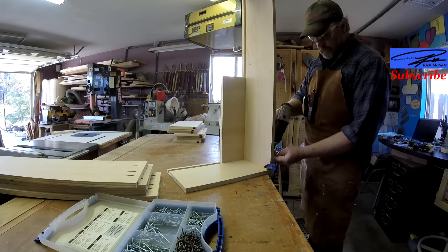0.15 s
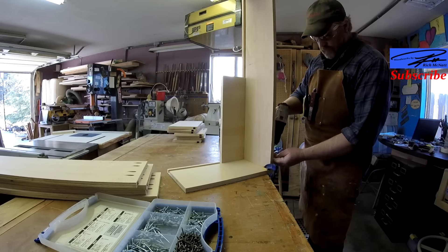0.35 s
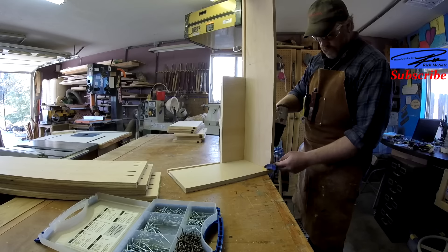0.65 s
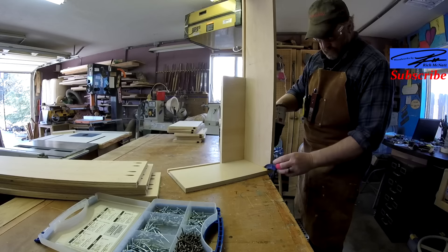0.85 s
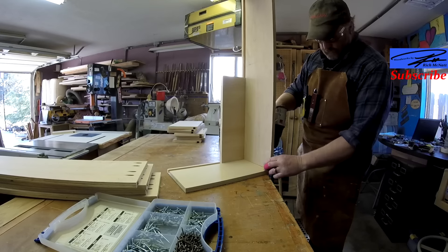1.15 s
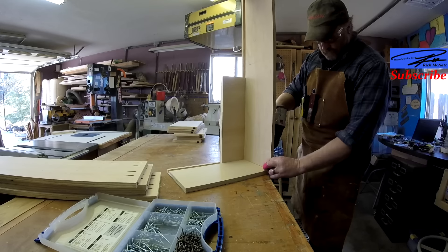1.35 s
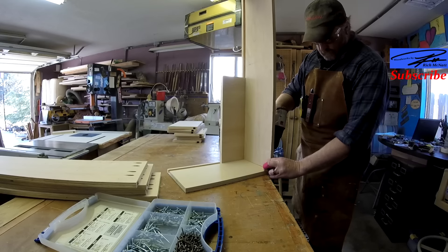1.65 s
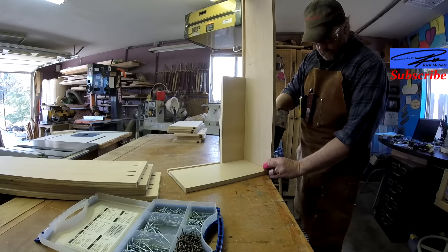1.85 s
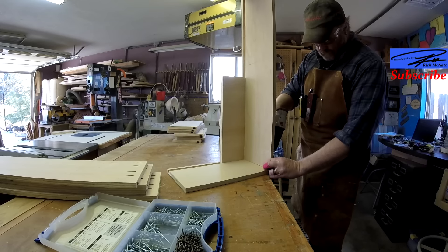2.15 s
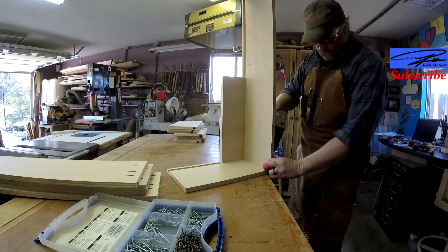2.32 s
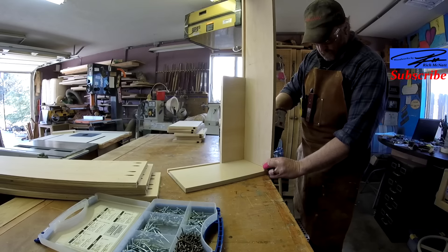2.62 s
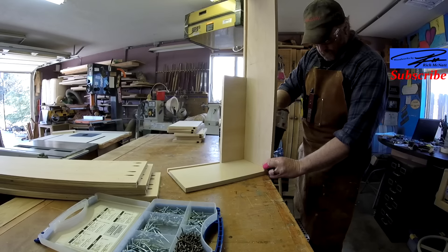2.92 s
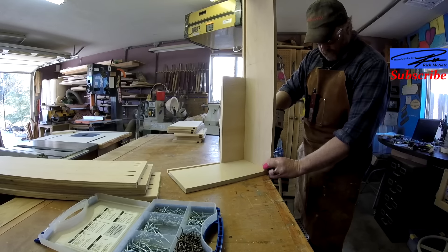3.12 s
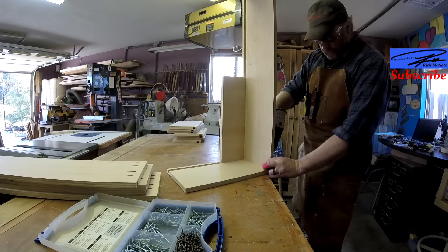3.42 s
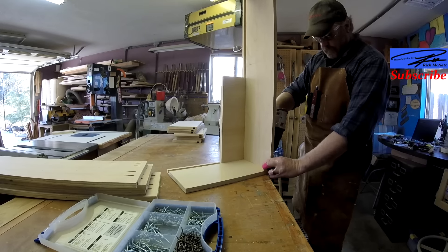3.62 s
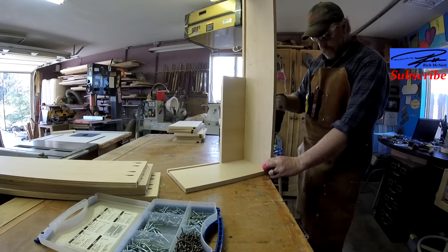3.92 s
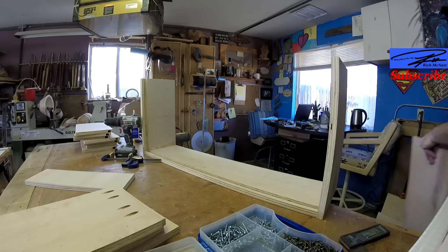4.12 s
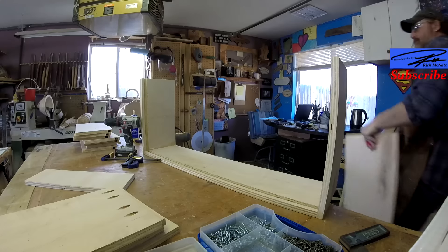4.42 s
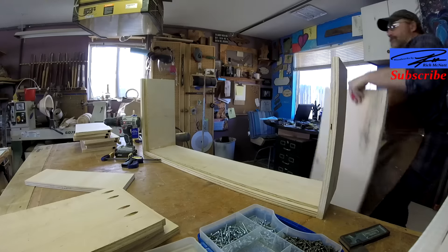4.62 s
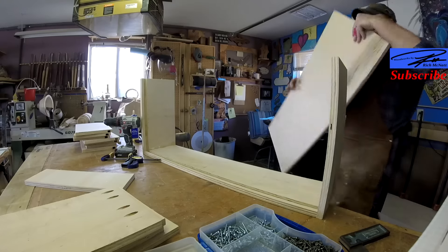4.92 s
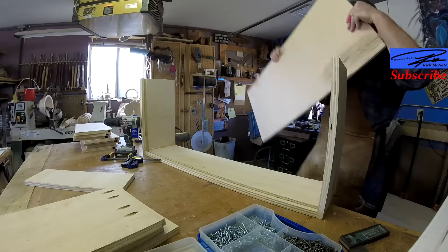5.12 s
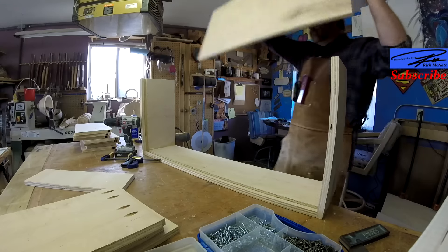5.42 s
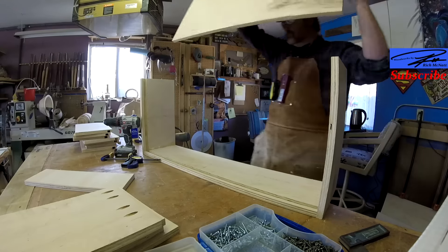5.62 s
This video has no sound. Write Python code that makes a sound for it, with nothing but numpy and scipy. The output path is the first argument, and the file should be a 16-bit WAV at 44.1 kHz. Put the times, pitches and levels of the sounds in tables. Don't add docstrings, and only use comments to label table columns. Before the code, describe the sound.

A cordless driver gives six short whining, grinding pulls into a plywood box, its clutch rattling the boards, followed by soft panel handling.

```python
import sys
import numpy as np
from scipy import signal
from scipy.fft import rfft, irfft, next_fast_len
from scipy.io import wavfile
from scipy.ndimage import uniform_filter1d, map_coordinates

SR = 44100
rng = np.random.default_rng(int(sys.argv[2]) if len(sys.argv) > 2 else 0)


def store_pcm(level_fs):
    pcm = np.round(np.clip(level_fs, -1, 1) * 32767).astype(np.int16)
    wavfile.write(sys.argv[1], SR, np.atleast_2d(pcm).T)


def volts_from_db(level):
    exponent = np.asarray(level, float) / 20
    return 10 ** exponent


N = 254016

# (start [s], let go [s], gear noise [dB], hiss re noise [dB], whine re noise [dB])
PULLS = [
    (0.935, 1.12, -36, -1, -4.5),
    (1.387, 1.52, -33.5, -2, -1),
    (1.809, 1.926, -33, -4, 4),
    (2.296, 2.414, -32, -6.5, 2),
    (2.838, 2.933, -34, 0, 10.5),
    (3.441, 3.512, -31, -12.5, -8),
]
# (spin-up [s], top gear rate [Hz], bite [s])
SPIN_UP = [(.135, 945, .004), (.1, 795, .028), (.072, 700, .02), (.042, 530, .028), (.058, 570, .024),
           (.02, 480, .022)]
START_SHARE, SAG_HZ_PER_S = 0.48, 750
ATTACK_DB, SWELL_DB_PER_S, RELEASE_DB_PER_S, COAST_S = 11.5, 19, 285, 0.075
HISS_DB_PER_OCT, WHINE_DB_PER_OCT = 9.5, 7
WHINE_FADE_DB_PER_S = 135
# (multiple of the gear rate [1], level [dB])
WHINE_PARTIALS = [(2, -9), (3, -9), (4, 4), (5, -13), (6, -5), (7, -12), (8, -3), (12, 1)]
# (multiple [1], width [Hz], level [dB])
BLURRED_BANDS = [(2, 150, -8), (4, 170, -0.5), (8, 590, 1.5), (12, 970, -21)]
# (frequency [Hz], level per Hz [dB])
GEAR_SPECTRUM = [(410, -28), (700, 4), (746, -5.5), (917, -2), (1040, -13), (1420, -1), (1680, 0),
                 (1760, 2.5), (2190, -4.5), (2590, -0.5), (3480, -6.5), (4010, -10), (5530, -7.5),
                 (11300, -27.5), (15000, -45)]
# (frequency [Hz], width [Hz], level [dB])
HOUSING_MODES = [(1760, 200, -12.5), (3400, 220, -3.5), (4460, 300, -6), (6660, 330, -9)]
SPLIT_HZ = 3700
# (time [s], length [s], level [dB], hiss re grind [dB])
CLUTCH_SLIPS = [
    (0.94, 0.0092, -34, -3.5),
    (1.921, .005, -21.5, -7),
    (2.353, 0.067, -22.5, -13),
    (2.945, 0.043, -25.5, -10.5),
    (3.461, .04, -37, -19),
    (3.508, 0.014, -40, 6),
]
SLIP_RISE_DB_PER_S, SLIP_FALL_DB_PER_S = 2500, 418

# (time [s], board level [dB], bench thump re board [dB], steel crack re board [dB],
# crack brightness [dB])
CLUTCH_JOLTS = [(1.904, -12.5, -3, -38, -5), (1.921, -8, -7, -9.5, -7), (2.336, -15.5, 3.5, -19, -23),
                (2.352, -1, -12.5, -22, -10), (2.3705, -1.5, -13.5, -17.5, -19), (2.389, -2, -13.5, -32, 2),
                (2.405, -4, -9, -11, 13), (2.424, -8, -40, -26, -1), (2.925, -16, -2, -26, -10),
                (2.942, 3, -19, -32, -13), (2.962, -4, -10, -13, -1), (2.982, -5.5, -26, -25, -12),
                (3.4643, -2, -19, -29, -7), (3.4962, -1.5, -20, -14.5, 3), (3.508, -20, -6, -6, -3)]
JOLT_HZ = 366
# (time [s], board level [dB], thump re board [dB],
# tap re board [dB], board pitch [Hz])
KNOCK_EVENTS = [(0.369, -28, -26, -13, 400), (0.426, -35, -4, -12, 470), (0.482, -45, -17, -18, 470),
                (0.526, -37.5, -7, 0, 420), (0.553, -30.5, 2, -1.5, 400), (0.6, -37, -20, -18, 483),
                (0.887, -28, -26, -8.5, 415), (0.944, -27, -22, 2, 454), (1.298, -38, -16, -2, 418),
                (1.392, -19.5, -38, -9.5, 415), (1.816, -24.5, -20, -8, 510), (2.3, -30, -17, -18, 293),
                (2.841, -16.5, -24, -21, 301), (3.442, -15, -17, -17, 320), (3.753, -44, -16, 0, 290),
                (4.259, -39.5, -5.5, -14, 500), (4.365, -38, -11.5, -20, 534), (4.92, -37.5, -16, -7, 360),
                (4.95, -40, -11, -8, 375), (5.069, -40, -22, -6, 362), (5.693, -41.5, -20, -11, 400)]
KNOCK_BRIGHT_DB = -11
# (frequency [Hz], level [dB], t60 [s])
BOARD_MODES = [(222, -0.5, 0.062), (252, 1, 0.049), (301, 1, 0.08), (356.6, 2, 0.081), (400, -1.5, 0.081),
               (469.9, 5.5, 0.058), (536, -3.5, 0.066), (644, -3.5, 0.063), (690, -8.5, 0.13),
               (753, -8, 0.079), (920, -13, 0.019), (1110, -37, 0.026)]
# (frequency [Hz], level [dB], t60 [s])
BENCH_MODES = [(60.4, -14, 0.38), (88, -0.5, 0.1), (122.7, -0.5, 0.1), (157.3, 4, 0.14)]
# (frequency [Hz], level [dB], t60 [s])
LEG_MODES = [(45, -8, 0.17), (61.4, 2, 0.17), (91, -6, 0.19), (155, -9.5, 0.31)]
# (frequency [Hz], level [dB], t60 [s])
PANEL_MODES = [(71.4, -13, 0.15), (134, -9, 0.073), (192, -12, 0.071), (249, -8, 0.082), (301, -1, 0.08),
               (400, -6, 0.044), (475, -1, 0.21), (517, -9, 0.085), (632, -7.5, 0.1), (753, -17, 0.144),
               (1130, -12.5, 0.063)]
# (frequency [Hz], level per Hz [dB])
STEEL_SPECTRUM = [(500, -21), (1000, -3.5), (1600, 13), (2300, -7.5), (3300, 11), (3900, -28), (5200, -19),
                  (7000, -16), (10000, -35), (15000, -48)]
# (frequency [Hz], level per Hz [dB])
TAP_SPECTRUM = [(500, -13), (900, -12), (1170, 3.5), (1500, -3.5), (2200, -5), (3300, -17), (5000, -13),
                (8000, -28), (15000, -56)]

# (time [s], length [s], rustle [dB], board rub re rustle [dB],
# fine cloth hiss re rustle [dB])
HAND_MOVES = [(0.19, 0.17, -72.5, 17.5, -14), (0.288, 0.09, -71, 19.5, -14), (0.443, .14, -67.5, 17.5, -15),
              (0.545, 0.061, -52, 6, -21), (3.709, 0.025, -71.5, -7, -17), (3.772, 0.081, -60.5, 0, -15),
              (4.087, 0.08, -71, 13, -14), (4.28, 0.13, -65.5, 12, -10), (4.433, 0.13, -64.5, 8, -1.5),
              (4.562, .09, -66, 1, -17), (4.68, .08, -71, -3, -9), (4.792, 0.13, -62.5, -4, -10),
              (4.946, 0.12, -60.5, 4, -17), (4.86, .06, -65, 5.5, -17), (5.068, .15, -56, 1.5, -13),
              (5.212, .07, -66.5, -2, 0.5), (5.312, 0.05, -71, 0, -3), (5.467, 0.19, -67, 5, -1),
              (5.604, 0.14, -70, 5, -9), (5.72, 0.076, -66.5, 2, -2)]
MOVE_RISE_SHARE, MOVE_HOLD_SHARE = 0.55, 0.34
MOVE_DROP_DB = 15.5
# (frequency [Hz], level per Hz [dB])
RUSTLE_SPECTRUM = [(500, -12), (800, 2), (1300, -7), (1900, -4.5), (2500, -9.5), (3000, -5), (3800, -12),
                   (5500, -22), (9000, -39), (14000, -50)]
# (frequency [Hz], level per Hz [dB])
CLOTH_SPECTRUM = [(2500, -23), (4500, -4), (6500, -1), (9000, -7.5), (13000, -20)]
# (frequency [Hz], level per Hz [dB])
SQUEAL_SPECTRUM = [(4500, -45), (5900, -14), (6500, 9), (7100, -15), (9000, -40)]
SQUEAL_S, SQUEAL_BUILD_S, SQUEAL_DB, SQUEAL_STOP_DB_PER_S = 4.41, 0.11, -63.5, 300

# (frequency [Hz], t60 [s])
SHOP_T60 = [(60, 0.45), (350, 0.43), (1000, 0.41), (3000, 0.38), (6500, 0.29), (12000, 0.27)]
# (frequency [Hz], level per Hz [dB])
AIR_SPECTRUM = [(12, 1), (20, 9), (92, 0.5), (249, -6), (320, -8.5), (433, -9), (541, -10.5), (820, -16),
                (1690, -20), (1940, -21.5), (6740, -32.5), (13100, -43), (15000, -45)]
AIR_DB = -52
DIP_S, TOP_HZ = 4.133, 15250


def driver():
    gate, gear_hz, noise_db, hiss_db, whine_db = trigger()
    slopes = [SLIP_RISE_DB_PER_S] * len(CLUTCH_SLIPS), [SLIP_FALL_DB_PER_S] * len(CLUTCH_SLIPS)
    slip = bumps([row[:3] for row in CLUTCH_SLIPS], *slopes)
    slip_hiss = bumps([(s, hold, db + more_db) for s, hold, db, more_db in CLUTCH_SLIPS], *slopes)

    phase = 2 * np.pi * np.cumsum(gear_hz * (1 + 0.007 * wobble(90))) / SR
    partials = sum(volts_from_db(db + 3.2 * wobble(80)) * np.sin(k * phase + 7 * rng.random())
                   for k, db in WHINE_PARTIALS)
    bands = sum(volts_from_db(db) * (wobble(2 * w) * np.sin(k * phase) + wobble(2 * w) * np.cos(k * phase))
                for k, w, db in BLURRED_BANDS)
    whine = coloured(unit(partials) + volts_from_db(-4) * unit(bands), GEAR_SPECTRUM)
    whine = whine + volts_from_db(-7.0 + 7.3 * wobble(49.07)) * np.sin(phase)

    teeth = 1 + 0.62 * np.cos(phase)
    noise = coloured(teeth * volts_from_db(0.61 * wobble(220)) * patchy(depth_db=3.5), GEAR_SPECTRUM)
    noise = filtered(noise, lambda f: 1 + sum(volts_from_db(db) / (1 + (2 * (f - hz) / w) ** 2)
                                              for hz, w, db in HOUSING_MODES))
    high = lambda hz: 1 / (1 + (SPLIT_HZ / (hz + 1)) ** 6)
    grind = unit(filtered(noise, lambda hz: 1 - high(hz)))
    hiss = unit(filtered(noise, high))
    buzz = through_panel(volts_from_db(3.8 * wobble(70)) * rng.standard_normal(N))

    run = gate * volts_from_db(noise_db)
    grinding = np.hypot(run, slip) * volts_from_db(-0.5) * grind
    buzzing = np.hypot(run, volts_from_db(-2) * slip) * volts_from_db(1.4) * buzz
    hissing = np.hypot(run * volts_from_db(hiss_db), slip_hiss) * hiss
    return volts_from_db(-4.5) * (grinding + buzzing + hissing + run * volts_from_db(whine_db) * whine)


def trigger():
    t = np.arange(N) / SR
    k = np.clip(np.searchsorted([p[0] for p in PULLS], t) - 1, 0, None)
    start, let_go, level_db, hiss_db, whine_db = np.transpose(PULLS)[:, k]
    spin, top_hz, bite = np.transpose(SPIN_UP)[:, k]
    age = np.clip(t - start, 0, let_go - start + COAST_S)
    share = START_SHARE + (1 - START_SHARE) * np.sin(np.pi / 2 * np.minimum(age / spin, 1))
    loaded = np.maximum(age - spin, 0)
    gear_hz = top_hz * share - SAG_HZ_PER_S * loaded
    attack = ATTACK_DB * np.maximum(1 - age / bite, 0)
    release = RELEASE_DB_PER_S * np.maximum(age + start - let_go, 0)
    noise_db = level_db - attack + SWELL_DB_PER_S * age - release
    octaves = np.log2(share)
    hiss_db = hiss_db + HISS_DB_PER_OCT * octaves
    whine_db = whine_db + WHINE_DB_PER_OCT * octaves - WHINE_FADE_DB_PER_S * loaded
    gate = np.clip(np.minimum(t - start, let_go + COAST_S - t) / 0.0023, 0, 1)
    return gate, gear_hz, noise_db, hiss_db, whine_db


def clutch_jolts():
    events = [(*row, JOLT_HZ) for row in CLUTCH_JOLTS]
    return blows(events, BENCH_MODES, STEEL_SPECTRUM, focus_db=1.5, attack=0.001, push=0.66,
                 crack_t60=0.027, board_db=-1.5, base_db=1.5, crack_db=1.5)


def knocks():
    events = [(*row[:4], KNOCK_BRIGHT_DB, row[-1]) for row in KNOCK_EVENTS]
    return blows(events, LEG_MODES, TAP_SPECTRUM, focus_db=20, attack=0.0048, push=0.045,
                 crack_t60=0.028, board_db=-5.5, base_db=5.0, crack_db=-7.5)


def blows(events, base, edge, focus_db, attack, push, crack_t60, board_db, base_db, crack_db):
    out, t = np.zeros(N + SR), np.arange(SR // 3) / SR
    luck = rng.standard_normal((len(events), 32))
    shove = -push * np.exp(-((t - 0.0015) / 0.00076) ** 2)
    for (s, db, thump_db, snap_db, bright_db, pitch_hz), row in zip(events, luck):
        colour = [(hz, level + bright_db * (hz > SPLIT_HZ)) for hz, level in edge]
        crack = coloured(rng.standard_normal(len(t)), colour)
        crack = crack * volts_from_db(-60 * t / crack_t60) * (1 - np.exp(-t / 0.00049))
        spot = [(hz, level - focus_db * abs(np.log2(hz / pitch_hz)), t60)
                for hz, level, t60 in BOARD_MODES]
        board = volts_from_db(board_db) * (ring(spot, row[:24], attack) + shove)
        thump = volts_from_db(thump_db + base_db) * ring(base, row[24:], 0.0031)
        hit = board + thump + volts_from_db(snap_db + crack_db) * crack
        out[round(s * SR):][:len(t)] += volts_from_db(db) * hit
    return out[:N]


def ring(modes, luck, attack):
    t = np.arange(SR // 3) / SR
    y = -sum(volts_from_db(db + 2.5 * a - 60 * t / t60) * np.sin(2 * np.pi * hz * (1 + 0.012 * b) * t)
             for (hz, db, t60), a, b in zip(modes, luck[::2], luck[1::2]))
    y = y * (1 - np.exp(-t / attack))
    return y / np.max(np.abs(y))


def through_panel(x):
    def response(f):
        total = 0
        for k, (hz, db, t60) in enumerate(PANEL_MODES):
            w = 1.06 * np.log(1000) / (np.pi * t60)
            mode = 1j * f * np.sqrt(w) / (hz * hz - f * f + 1j * f * w)
            total = total + (-1) ** k * volts_from_db(db) * mode
        return total
    return unit(filtered(x, response))


def handling():
    s, length, db, rub_db, hiss_db = np.transpose(HAND_MOVES)
    rise, fall = MOVE_DROP_DB / (MOVE_RISE_SHARE * length), MOVE_DROP_DB / length
    moving = lambda extra_db: bumps(zip(s, MOVE_HOLD_SHARE * length, db + extra_db), rise, fall)
    rub = through_panel(volts_from_db(2.9 * wobble(40)) * rng.standard_normal(N))
    rustle = coloured(volts_from_db(1.1 * wobble(90)) * patchy(depth_db=1.5), RUSTLE_SPECTRUM)
    hiss = coloured(volts_from_db(3.5 * wobble(42)) * rng.standard_normal(N), CLOTH_SPECTRUM)
    squeal = coloured(volts_from_db(4.0 * wobble(60)) * rng.standard_normal(N), SQUEAL_SPECTRUM)
    skin = bumps([(SQUEAL_S, 0, SQUEAL_DB)], [MOVE_DROP_DB / SQUEAL_BUILD_S], [SQUEAL_STOP_DB_PER_S])
    return skin * squeal + moving(rub_db) * rub + moving(0) * rustle + moving(hiss_db) * hiss


def workshop(x):
    out, step = np.zeros(N + 2 * SR), SR // 2
    for start in range(-step // 2, N, step):
        hz, t, z = signal.stft(rng.standard_normal(SR * 3 // 4), SR, nperseg=256)
        decay = volts_from_db(-60 * t / along(SHOP_T60, hz)[:, None])
        tail = signal.istft(z * decay, SR, nperseg=256)[1]
        wet = signal.fftconvolve(x[max(start, 0):start + step], tail / np.linalg.norm(tail))
        out[max(start, 0) + 260:][:len(wet)] += wet
    return out[:N]


def air():
    return volts_from_db(AIR_DB + 0.3 * wobble(13)) * coloured(rng.standard_normal(N), AIR_SPECTRUM)


def bumps(rows, rise, fall):
    t = np.arange(N) / SR
    power = 0
    for (s, hold, db), up, down in zip(rows, rise, fall):
        before, after = np.maximum(up * (s - t), 0), np.maximum(down * (t - s - hold), 0)
        power = power + volts_from_db(db - before - after) ** 2
    return np.sqrt(power)


def patchy(depth_db):
    z = signal.stft(rng.standard_normal(N), nperseg=256)[2]
    field = uniform_filter1d(rng.standard_normal(z.shape), size=3, axis=0)
    field = uniform_filter1d(field, size=5, axis=1)
    return signal.istft(z * volts_from_db(depth_db * unit(field)), nperseg=256)[1][:N]


def wobble(rate):
    return map_coordinates(rng.standard_normal(int(N * rate / SR) + 4), [np.arange(N) * rate / SR])


def coloured(x, spectrum):
    return unit(filtered(x, lambda hz: volts_from_db(along(spectrum, hz))))


def filtered(x, response):
    m = next_fast_len(len(x) + 8192)
    return irfft(rfft(x, m) * response(np.fft.rfftfreq(m, 1 / SR)), m)[:len(x)]


def along(points, hz):
    f, v = np.transpose(points)
    return np.interp(np.log(hz + 1), np.log(f + 1), v)


def unit(x):
    return x / np.sqrt(np.mean(x ** 2) + 1e-20)


def scene():
    near = driver() + clutch_jolts() + knocks()
    return (volts_from_db(0.5) * near + volts_from_db(-6.5) * workshop(near) + handling() + air())[None]


def low_pass(x):
    return signal.sosfilt(signal.butter(12, 15200, fs=SR, output="sos"), x)


def record(dry):
    dip = 1 - 0.9 * np.exp(-((np.arange(N) / SR - DIP_S) / 0.004) ** 2)
    x = dry[0] / (1 + np.abs(dry[0] / 0.97) ** 8) ** (1 / 8)
    x = filtered(x, lambda hz: (1j * hz / (1j * hz + 47)) ** 2 * (hz < TOP_HZ)) * dip
    return low_pass(x[None])


dry = scene()
out = record(dry)
store_pcm(out)
```